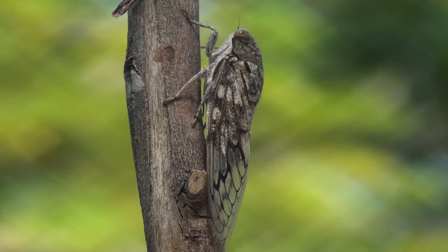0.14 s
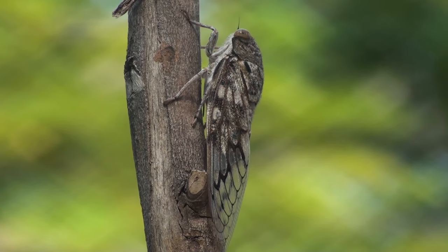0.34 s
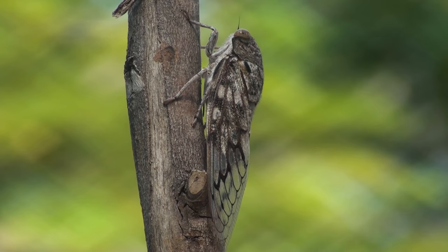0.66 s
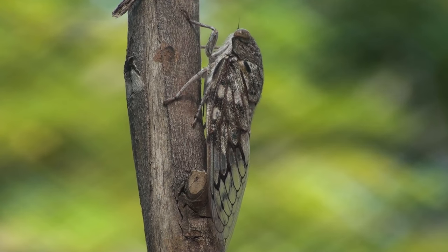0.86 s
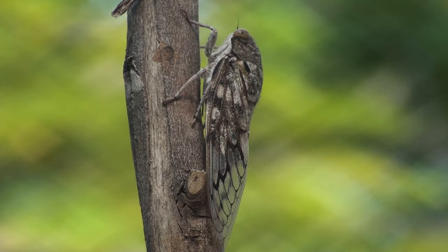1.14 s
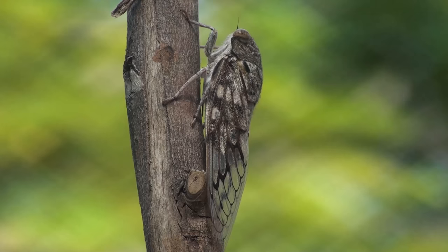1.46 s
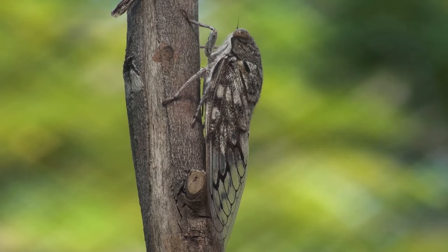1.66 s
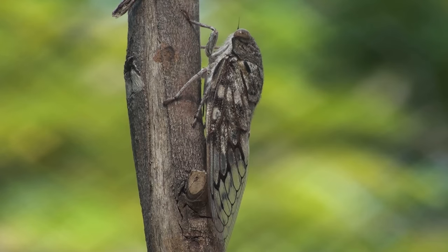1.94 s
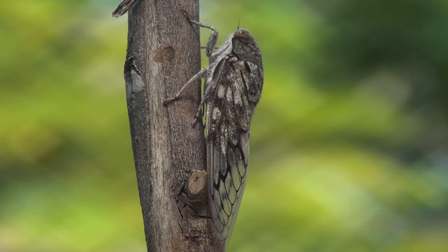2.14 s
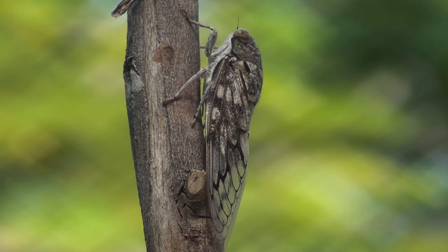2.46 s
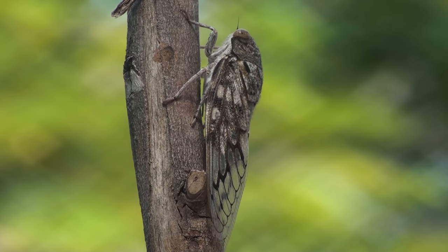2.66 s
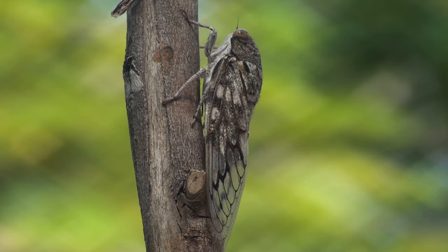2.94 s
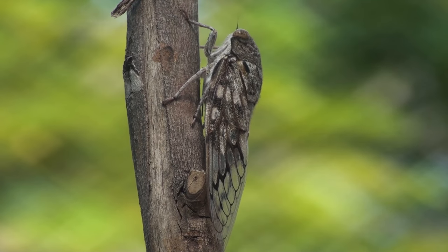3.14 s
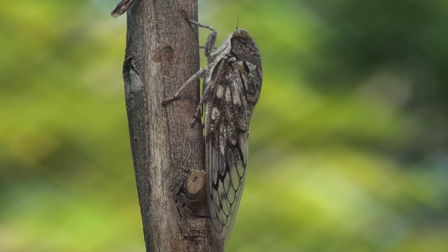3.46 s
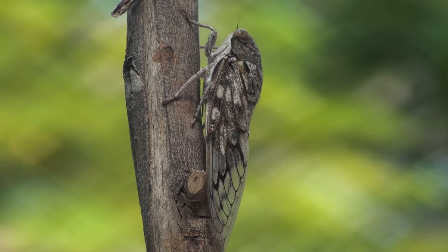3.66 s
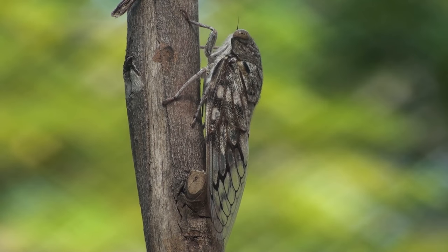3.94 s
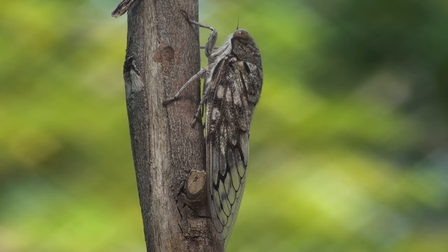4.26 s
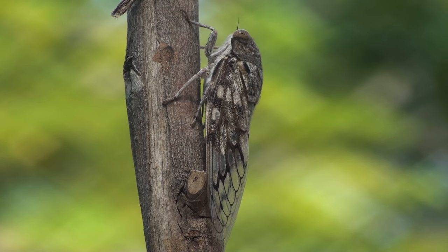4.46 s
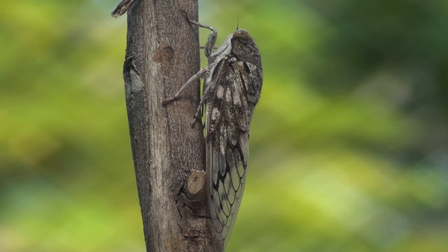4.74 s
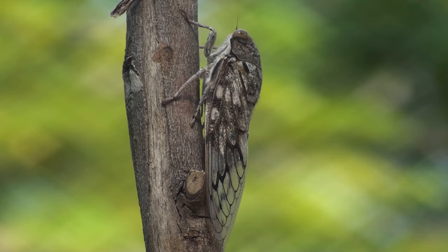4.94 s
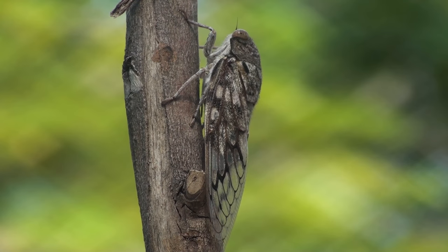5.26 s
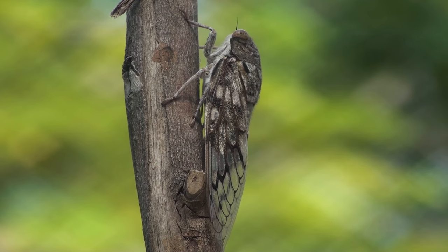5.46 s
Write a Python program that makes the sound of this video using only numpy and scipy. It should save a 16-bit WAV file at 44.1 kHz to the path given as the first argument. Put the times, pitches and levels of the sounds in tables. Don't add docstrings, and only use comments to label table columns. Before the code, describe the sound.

Close cicadas in branches make a loud, unbroken, gritty shrill around six kilohertz, nearly steady. Far behind, an engine run with gear whine dies away in the first half second, then another pull rises from about 1.5 to 4 seconds, followed by fainter overlapping pulls. Short belt rasps, soft traffic rumble and a few small bird chips lie underneath. Outdoors, stereo microphone near the insects, slight leafy echo.

```python
import sys
import numpy as np
from scipy import signal
from scipy.fft import rfft, irfft, next_fast_len
from scipy.io import wavfile

SR = 44100
rng = np.random.default_rng(int(sys.argv[2]) if len(sys.argv) > 2 else 0)


def wav_out(sig):
    wavfile.write(sys.argv[1], SR, np.round(np.clip(np.atleast_2d(sig).T, -1, 1) * 32767).astype(np.int16))


def elevation(decibels):
    levels = np.asarray(decibels, float)
    return 10 ** (levels / 20)


N = 246519


def rms_one(x):
    return x / np.sqrt(np.mean(x ** 2) + 1e-20)


def pan(x, db):
    return x * elevation(np.array([[db / 2], [-db / 2]]))


def drift(rate):
    r = np.exp(-80 * np.pi * rate / SR)
    noise = rng.standard_normal(N // 40 + 2002)
    slow = signal.lfilter([1], [1, -2 * r, r * r], noise)[2000:]
    return np.interp(np.arange(N) / 40, np.arange(len(slow)), rms_one(slow - slow.mean()))


def narrow_noise(hz, width_hz):
    lowpass = signal.butter(2, width_hz / 2, fs=SR, output="sos")
    wobble = signal.sosfilt(lowpass, rng.standard_normal((2, N)))
    phase = 2 * np.pi * np.cumsum(hz * np.ones(N)) / SR
    return rms_one(wobble[0] * np.cos(phase) + wobble[1] * np.sin(phase))


def drums(per_s, ribs, open_share, wander, jitter_s, uneven_db):
    rounds = rng.random() + np.cumsum(per_s / 2 * (1 + wander * drift(1.5))) / SR
    starts = np.interp(np.arange(int(rounds[-1]) + 1), rounds, np.arange(N), left=-SR)
    spacing = (np.arange(ribs) + rng.random((2, ribs))) / ribs * open_share
    pattern = ((spacing + [[0], [1]]) / per_s).ravel()
    jitter = jitter_s * rng.standard_normal((len(starts), 2 * ribs))
    at = starts[:, None] + SR * (pattern + jitter)
    size = elevation(uneven_db * rng.standard_normal(at.shape)) * rng.choice([-1, 1], 2 * ribs)
    inside = (at >= 0) & (at < N - 1)
    return np.bincount(at[inside].astype(int), size[inside], N)


ECHO_DB, ECHO_SPAN_S, ECHO_SPREAD_S = -7.5, .06, .00002


def foliage(size):
    lag, apart, strength = rng.random((3, 30, 1))
    gains = np.exp(-lag) * np.sign(strength - .5)
    gains = elevation(ECHO_DB) * gains / np.sqrt(np.sum(gains ** 2))
    arrivals = [SR * (.004 + ECHO_SPAN_S * lag + side * ECHO_SPREAD_S * (2 * apart - 1)) for side in (1, -1)]
    echoes = [np.sum(gains * np.sinc(np.arange(4096) - at), axis=0) for at in arrivals]
    return 1 + rfft(echoes, size)


# (centre [Hz], width [Hz], level [dB])
BODY = [(4030, 1110, -29.1), (4260, 90, -22.7), (4470, 230, -18.2), (4730, 200, -9.1), (4880, 90, -5.9),
        (5050, 250, -5.7), (5310, 450, -9.6), (5460, 90, -6.8), (5630, 310, -6.1), (5790, 110, -5.3),
        (5890, 120, -2.4), (6030, 130, -0.2), (6160, 390, -2.2), (6280, 370, -0.1), (6470, 100, -3.2),
        (6530, 90, -4.2), (6760, 500, -15.9), (6980, 100, -8.7), (7070, 90, -5.4), (7280, 290, -5.3),
        (7510, 110, -12.7), (7680, 170, -16.3), (7900, 180, -15.2), (8160, 930, -20.9), (8400, 430, -15.4),
        (8990, 630, -26.7), (9560, 620, -27.6), (10160, 430, -24.0), (10840, 1160, -31.2),
        (12060, 2870, -39.0)]
# (buckling rate [1/s], strength [dB], left over right [dB])
LEADERS = [
    (424.8, 9, .5),
    (410.5, 6, -1),
    (474.0, 5, 1.5),
]
# (time [s], level [dB])
EFFORT = [(0, -16), (.5, -15.5), (.65, -16.5), (1.55, -17), (1.75, -15.5), (3.7, -15), (5.2, -15.5),
          (5.59, -16)]
# (level over effort [dB], share of effort swing followed [1], random swell [dB])
REGISTERS = [
    (-1.5, 1.16, 0.17),
    (-6.5, .4, -0.63),
    (-7.5, .7, -0.1),
    (-15, .1, 0.46),
]
REGISTER_HZ = [(5450, 6750), (0, 5450), (6750, 7650), (7650, SR)]
CROWD_COUNT, CROWD_PAN_DB, SWELLS_PER_S = 16, 0.4, 1.04


def cicadas():
    crowd = [(rng.uniform(380, 490), rng.normal(0, 0.74), CROWD_PAN_DB * (-1) ** k)
             for k in range(CROWD_COUNT)]
    clicks = 0
    for per_s, db, lean_db in LEADERS + crowd:
        singer = drums(per_s, 4, open_share=.45, wander=.002, jitter_s=.00005, uneven_db=1.5)
        clicks = clicks + pan(elevation(db) * singer, lean_db)

    size = next_fast_len(N + 4096)
    hz = np.arange(size // 2 + 1) * SR / size
    body = 0
    for k, (f, width, db) in enumerate(BODY):
        body = body + (-1) ** k / (1 + 2j * (hz - f) / width) ** 2 * elevation(db)
    body = body / (1 + (3300 / (hz + 1)) ** 8)
    rung = rfft(clicks, size) * body * foliage(size)

    effort_s, effort_points_db = np.transpose(EFFORT)
    effort_db = np.interp(np.arange(N) / SR, effort_s, effort_points_db)
    mean_db = effort_db.mean()
    out = 0
    for (db, follows, swell_db), (low, high) in zip(REGISTERS, REGISTER_HZ):
        level_db = db + mean_db + follows * (effort_db - mean_db) + swell_db * drift(SWELLS_PER_S)
        part = irfft(rung * ((hz >= low) & (hz < high)), size)[:, :N]
        out = out + elevation(level_db) * rms_one(part)
    return out


# (starting level [dB], [(time [s], step [dB])])
LOW_VOICE = (-41.5, [(1.8, -2.5), (4.3, -18)])
# (starting level [dB], [(time [s], step [dB])])
HIGH_VOICE = (-60, [(2.15, 11), (3.4, 5.4)])
VOICE_STEP_S, VOICE_SWAY_DB = 0.14, 1.5


def voice_level_db(voice):
    level_db, steps = voice
    t = np.arange(N) / SR
    for s, step_db in steps:
        level_db = level_db + step_db * np.clip((t - s) / VOICE_STEP_S, 0, 1)
    return level_db + VOICE_SWAY_DB * drift(1.5)


def whistles():
    low = narrow_noise(3970, 73) + elevation(-5) * narrow_noise(3530, 220)
    high = narrow_noise(10180, 130)
    return pan(elevation(voice_level_db(LOW_VOICE) - 7.5) * low + elevation(voice_level_db(HIGH_VOICE) - 4) * high, .3)


def ring(clicks, modes):
    out = 0
    for hz, db, t60 in modes:
        r, w = elevation(-60 / (t60 * SR)), 2 * np.pi * hz / SR
        mode = signal.lfilter([0, elevation(db) * np.sin(w)], [1, -2 * r * np.cos(w), r * r], clicks + 1e-18)
        out = out + mode
    return rms_one(out)


# (start [s], end [s], first firing rate [1/s], last firing rate [1/s], thump level [dB])
ENGINE = [
    (0, 0.556, 18.2, 18, -36.5),
    (1.5, 3.95, 17.8, 23.3, -40),
    (4.05, 5.097, 23.8, 26.6, -47.5),
    (4.549, 5.59, 18.4, 19.1, -44.5),
]
FIRST_FIRING_S = [.021, .03, .03, .03]
# (multiple of firing rate [1], level [dB])
EXHAUST = [
    [(1, -37), (2, -14), (3, -11), (4, -23), (5, 4.5), (6, -23), (7, -3), (8, -10), (9, -19), (10, -11),
     (11, -15), (12, -17), (13, -12)],
    [(1, -22), (2, -14), (3, 0.5), (4, -8), (5, 3.5), (6, 4), (7, -2.5), (8, 1.5), (9, -5.5), (10, -17),
     (11, -7), (12, -6), (13, -7)],
    [(1, -27), (2, -12), (3, -21), (4, -5), (5, 5), (6, -12), (7, -4), (8, -9), (9, -19), (10, -23),
     (11, -17), (12, -20), (13, -5.5)],
]
PULL_TONE = [0, 1, 1, 2]
# (frequency [Hz], level [dB], 60 dB decay time [s])
CASING = [(556, 2, 0.0056), (873, -1, 0.022), (1324, 1, 0.014), (1890, 6.5, 0.0091), (2200, -5, 0.013),
          (2860, -6, 0.011)]
# (frequency [Hz], level [dB])
WHINE = [(565, -54.5), (725, -57), (890, -63), (1150, -61)]
WHINE_END_S = 0.57
SPEED_BEND = 1.35
PULL_RISE_S, PULL_FALL_S = 0.13, 0.043
CLATTER_DB, CLATTER_FOLLOWS = -53.5, 0.93
CLATTER_EASE_DB, CLATTER_EASE_S = -4.5, 0.47


def engine():
    t = np.arange(N) / SR
    out = 0
    unsteady = [elevation(1.7 * drift(3.0)) for order in EXHAUST[0]]
    for (start, end, slow, fast, thump_db), first, tone in zip(ENGINE, FIRST_FIRING_S, PULL_TONE):
        per_s = slow + (fast - slow) * np.clip((t - start) / (end - start), 0, 1) ** SPEED_BEND
        turns = np.cumsum(per_s) / SR
        turns = turns - np.interp(start + first, t, turns)
        thump = 0
        for (k, db), sway in zip(EXHAUST[tone], unsteady):
            thump = thump + elevation(db) * sway * np.cos(k * (2 * np.pi * turns - .1))

        fired = np.diff(np.floor(turns), prepend=np.floor(turns[0])) * elevation(1.0 * rng.standard_normal(N))
        burst_envelope = signal.lfilter([1], [1, -np.exp(-1 / (0.014 * SR))], fired)
        clatter = ring(burst_envelope * rng.standard_normal(N), CASING)
        ease_db = CLATTER_EASE_DB * (np.clip((t - start) / CLATTER_EASE_S, 0, 1) - .6)
        clatter_db = CLATTER_DB + CLATTER_FOLLOWS * (thump_db + 40.5) + ease_db

        on = np.clip((t - start) / PULL_RISE_S + 1, 0, 1) * np.clip((end - t) / PULL_FALL_S + 1, 0, 1)
        out = out + on * pan(-elevation(thump_db) * rms_one(thump), 1.7)
        out = out + on * pan(elevation(clatter_db) * clatter, 8.3)
    whine = sum(elevation(db) * narrow_noise(hz, 40) for hz, db in WHINE)
    return out + pan(whine * np.clip((WHINE_END_S - t) / 0.084, 0, 1), 15.5)


# (time of peak [s], level [dB], centre [Hz])
RASPS = [(-.02, -45, 1131), (.48, -51.5, 1080), (.82, -52, 1130), (1.63, -49, 1120), (1.78, -44, 1097),
         (1.98, -50, 1088), (2.99, -44, 1095), (4.06, -48, 1100), (4.17, -46, 1100), (4.981, -58, 1132),
         (5.28, -47, 1118)]
RASP_RISE_DB_PER_S, RASP_FALL_DB_PER_S, BELT_IDLE_DB = 66, 105, -59
RASP_SAG_HZ_PER_S = 130


def belt():
    s, db, hz = np.transpose(RASPS)
    t = np.arange(N) / SR
    late = t - s[:, None]
    slope_db = np.where(late < 0, RASP_RISE_DB_PER_S * late, -RASP_FALL_DB_PER_S * late)
    rasp_db = db[:, None] + slope_db
    loudest = rasp_db.argmax(axis=0)
    centre_hz = hz[loudest] - RASP_SAG_HZ_PER_S * np.clip(t - s[loudest], -.2, .2)
    level = elevation(rasp_db.max(axis=0)) + elevation(BELT_IDLE_DB)
    return pan(level * elevation(1.3 * drift(26)) * narrow_noise(centre_hz, 115), 2.8)


def at_hz(points, hz):
    point_hz, value = np.transpose(points)
    return np.interp(np.log(hz), np.log(point_hz), value)


# (frequency [Hz], level [dB])
HUM = [(12, -40), (20, -16), (63, -0.5), (97, 0), (184, -3), (436, -14.5), (608, -15.5), (1110, -16),
       (1480, -23), (2100, -13.5), (2570, -28), (3130, -25), (4000, -22), (5200, -44), (8800, -120)]
# (frequency [Hz], correlation [1])
LIKENESS = [(60, 1), (130, 0.92), (290, 0.93), (640, 0.58), (1410, 0.7), (3100, 0.91), (6820, 0.95),
            (15000, 0.88)]
# (frequency [Hz], left over right [dB])
LEAN = [(60, -0.5), (130, 1.5), (290, 4), (640, 4), (1410, 2), (3100, 5), (6820, -20), (15000, 0.0)]
# centres (time [s]), widths (time [s]), depths (level [dB])
LULL_S = [
    0.99,
    4.23,
    5.57,
]
LULL_WIDTH_S = [0.51, 0.45, .2]
LULL_DB = [-2, -1.5, 0.5]
HUM_DB, AIR_DB = -38.5, -48


def traffic():
    together = drift(1.5)
    edges = 22 * 2 ** np.arange(0, 8, .5)
    white = rng.standard_normal((2, 2, N))
    hum = 0
    for k, (low, high) in enumerate(zip(edges, edges[1:])):
        band = signal.butter(2, [low, high], "band", fs=SR, output="sos")
        mid, side = signal.sosfilt(band, white[k % 2])
        hz = np.sqrt(low * high)
        alike = np.clip(at_hz(LIKENESS, hz), -1, 1)
        flicker_db = 0.85 * (.5 * together + drift(11.0))
        lean_db = at_hz(LEAN, hz) / 2 * np.array([[1], [-1]])
        gain = elevation(at_hz(HUM, hz) + flicker_db + lean_db)
        hum = hum + gain * (np.sqrt(1 + alike) * mid + np.sqrt(1 - alike) * side * [[1], [-1]])

    t = np.arange(N) / SR
    swell_db = sum(db * np.exp(-((t - s) / width) ** 2) for s, width, db in zip(LULL_S, LULL_WIDTH_S, LULL_DB))
    highpass = signal.butter(4, 15000, "high", fs=SR, output="sos")
    air = signal.sosfilt(highpass, rng.standard_normal(N))
    return elevation(HUM_DB + swell_db - swell_db.mean()) * rms_one(hum) + elevation(AIR_DB) * rms_one(air)


# (time [s], length [s], start frequency [Hz], end frequency [Hz], level [dB])
CHIPS = [
    (0.076, .016, 1910, 1900, -50),
    (0.126, 0.016, 1910, 1860, -41),
    (0.185, 0.011, 1880, 1860, -39),
    (0.666, .1, 1330, 1315, -51),
    (3.764, .12, 664, 642, -49),
    (3.799, 0.2, 1430, 1392, -52),
    (4.01, 0.052, 1890, 1900, -41.5),
    (4.07, 0.045, 1820, 1715, -49),
    (4.286, .022, 3900, 3100, -46),
    (4.31, 0.033, 3260, 3130, -40),
]


def birds():
    out = np.zeros(N)
    for s, length, start_hz, end_hz, db in CHIPS:
        n, at = int(length * SR), int(s * SR)
        phase = 2 * np.pi * np.cumsum(np.linspace(start_hz, end_hz, n)) / SR
        out[at:at + n] += elevation(db + 2.0) * np.hanning(n) ** 0.38 * np.sin(phase)
    echo = 0.18 * np.roll(out, int(0.038 * SR))
    return pan(out + echo, .4)


def scene():
    return cicadas() + whistles() + engine() + belt() + traffic() + birds()


def roll_off(x):
    return signal.sosfilt(signal.butter(12, 15730, fs=SR, output="sos"), x)


def record(dry):
    rounded = 1.5 * np.tanh(dry / 1.5)
    mid, side = (rounded[0] + rounded[1]) / 2, (rounded[0] - rounded[1]) / 2
    side = signal.sosfiltfilt(signal.butter(8, 11000, fs=SR, output="sos"), side)
    return roll_off(np.array([mid + side, mid - side]))


dry = scene()
out = record(dry)
wav_out(out)
```